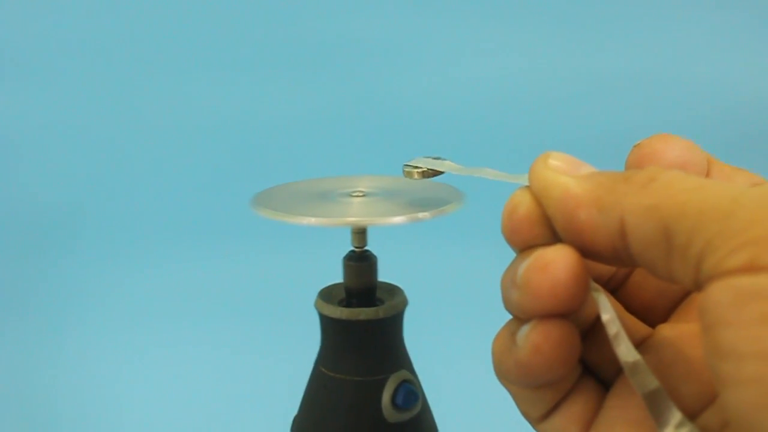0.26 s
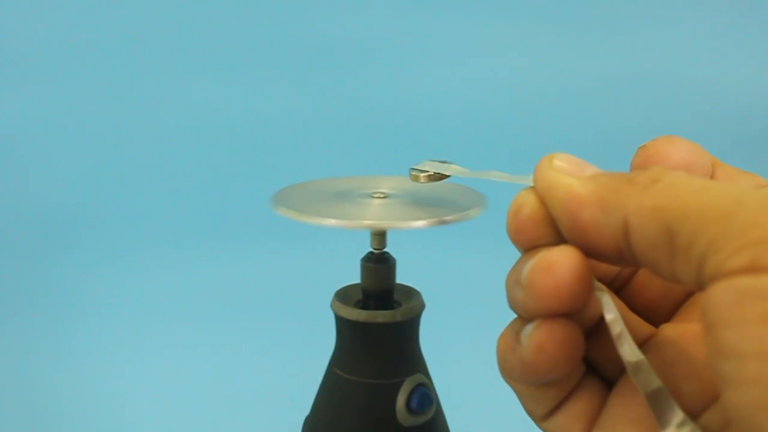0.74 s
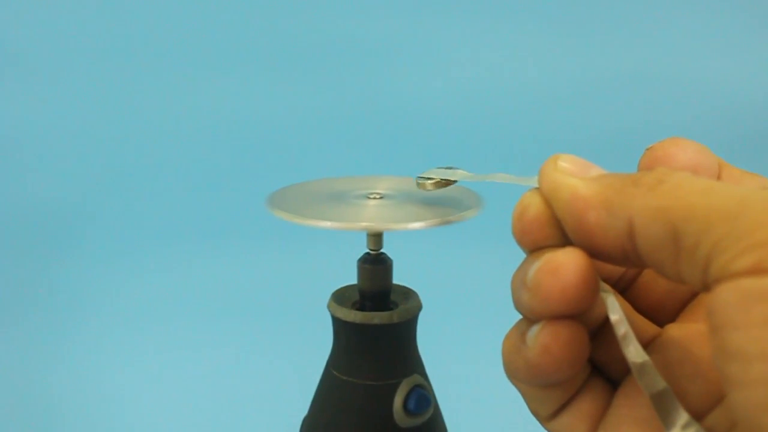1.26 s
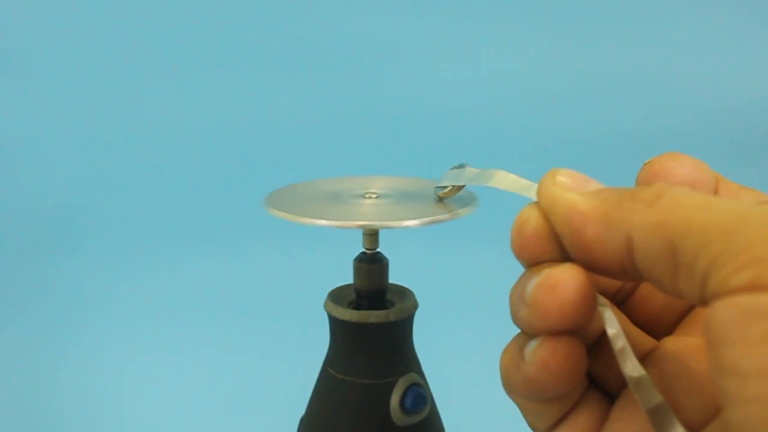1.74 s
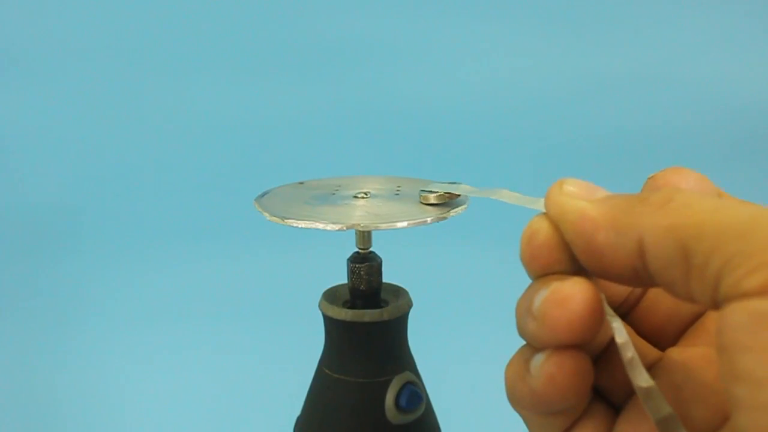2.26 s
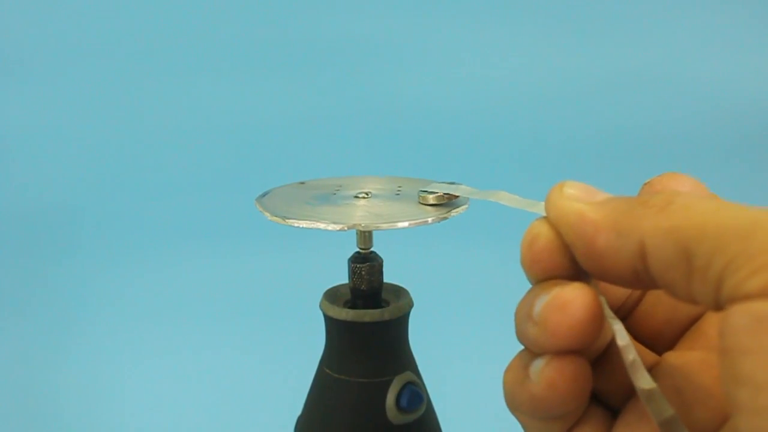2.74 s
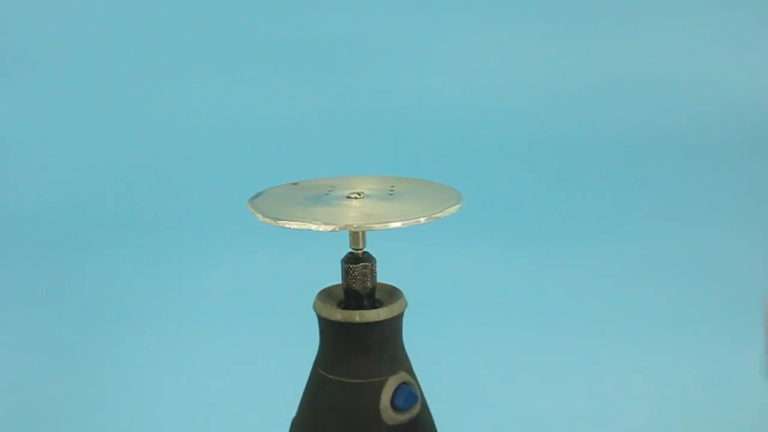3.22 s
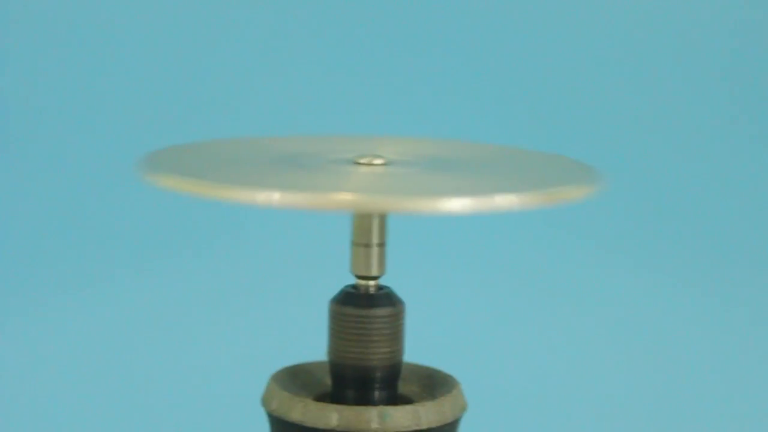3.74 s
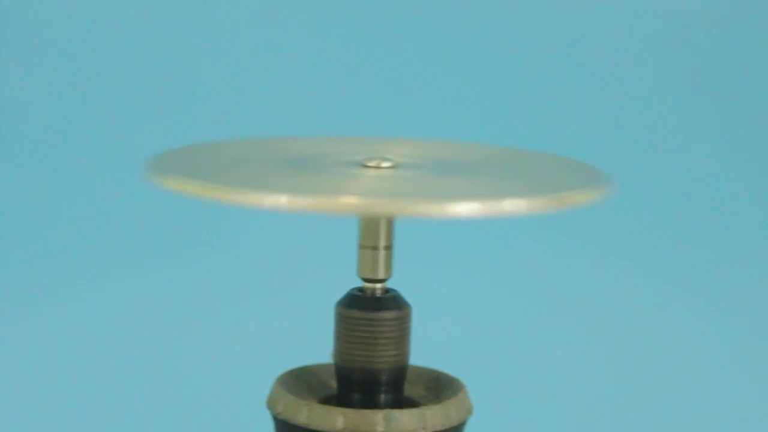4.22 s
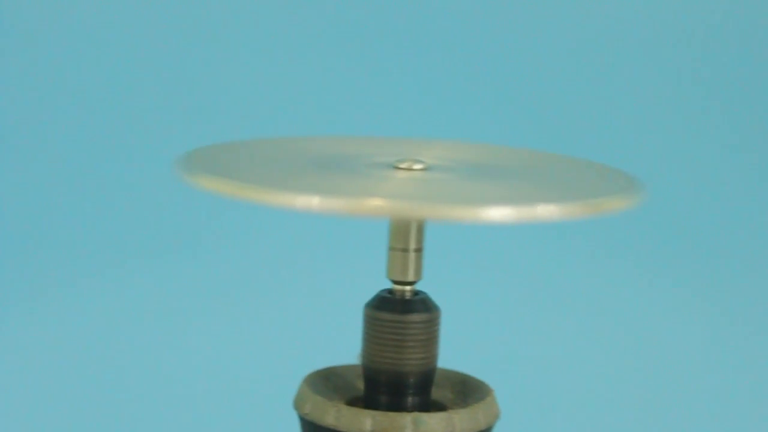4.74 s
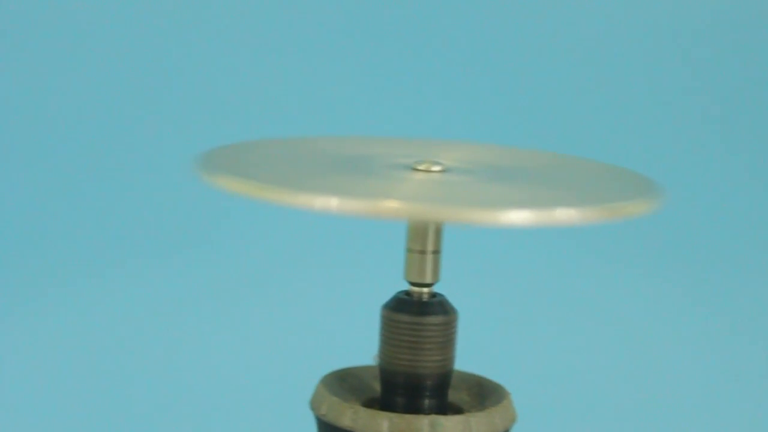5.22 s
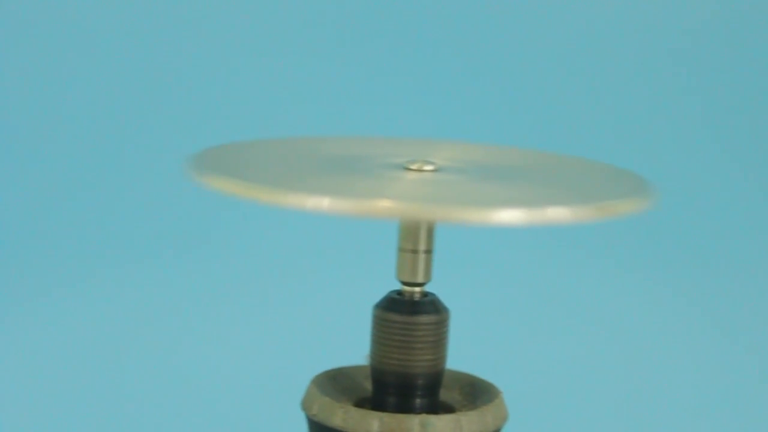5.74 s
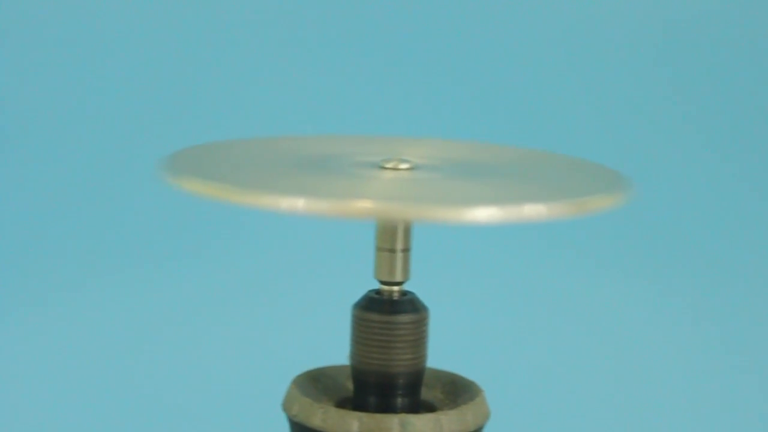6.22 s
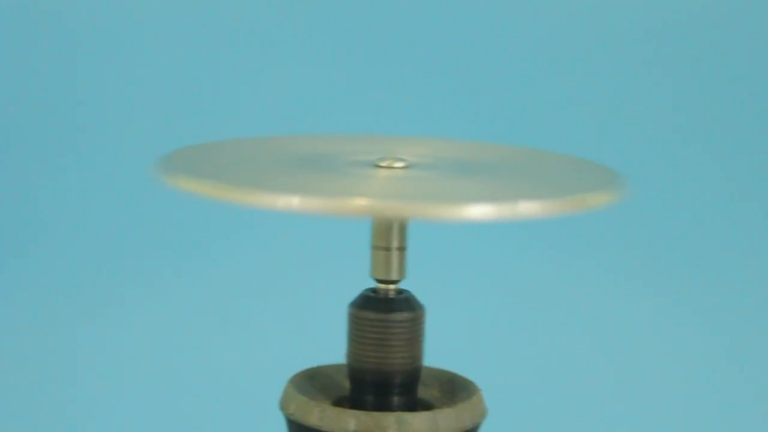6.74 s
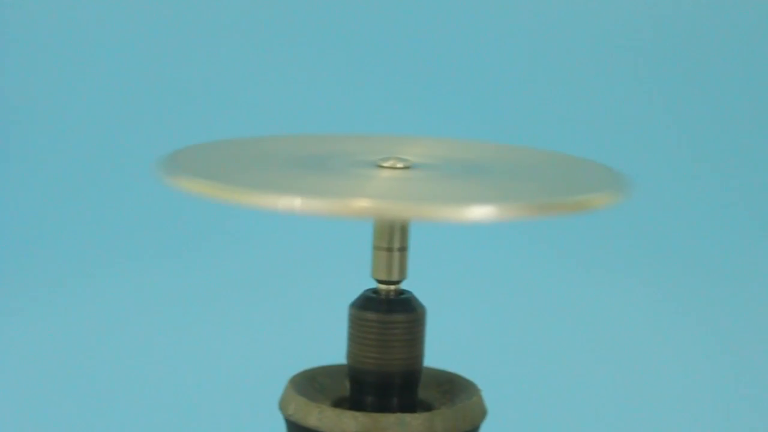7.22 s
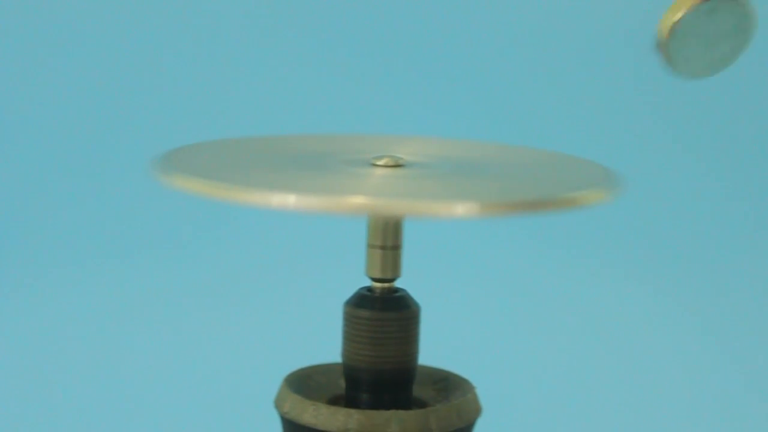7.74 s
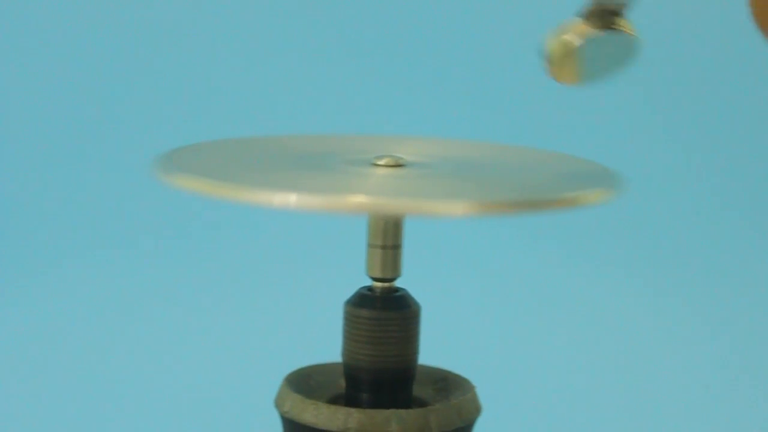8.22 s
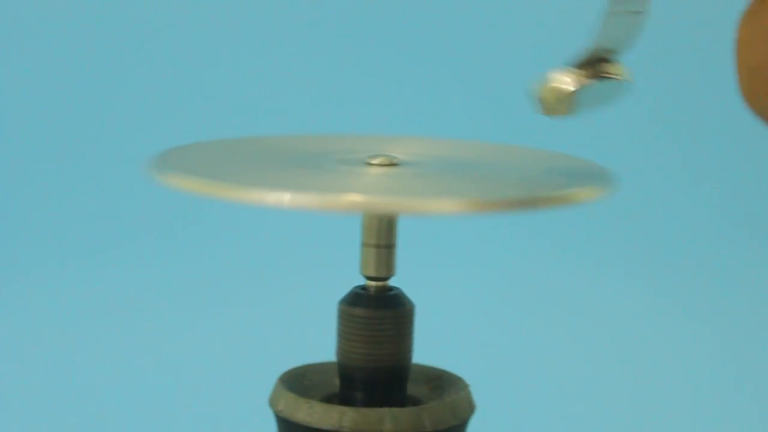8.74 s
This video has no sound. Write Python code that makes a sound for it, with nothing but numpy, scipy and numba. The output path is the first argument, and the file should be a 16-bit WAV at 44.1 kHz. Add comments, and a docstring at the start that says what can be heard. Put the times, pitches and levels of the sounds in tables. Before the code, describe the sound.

A small rotary tool winds down, a magnet strikes and scrapes its spinning metal disc, then the tool whines at full speed again.

```python
"""In a small room, a mains rotary tool spins a metal disc, is switched off and coasts down.
A magnet strikes the slowing disc, scrapes it to rest and is later pulled off, leaving it ringing.
Then the tool is abruptly at speed again and creeps up in pitch as it warms. Its unbalance hums,
its commutator and fan whine and its brushes hiss, over a bed of dull room tone."""
import sys
import numpy as np
from scipy import signal
from scipy.fft import rfft, irfft, next_fast_len
from scipy.io import wavfile
from scipy.ndimage import uniform_filter1d
from numba import njit

SR = 44100
rng = np.random.default_rng(int(sys.argv[2]) if len(sys.argv) > 2 else 0)


def bounce(signal):
    """Save signal as a 16-bit WAV file at the path given by the first command-line argument."""
    frames = np.transpose(np.atleast_2d(signal))
    limited = np.clip(frames, -1, 1)
    pcm = np.round(limited * 32767).astype(np.int16)
    wavfile.write(sys.argv[1], SR, pcm)


N = 395577
TIME = np.arange(N) / SR
POWER_OFF_S, RELEASE_S, RESTART_S = .51, 2.84, 3.48
FULL_SPEED_HZ, MAINS_PULSE_HZ = 186.3, 120


def undb(db):
    """Decibels to gain."""
    return 10 ** (np.asarray(db) / 20)

def unit(x):
    """Scale to rms 1."""
    return x / np.sqrt(np.mean(x ** 2))

def curve(table):
    """An automation curve through (time, value) points."""
    return np.interp(TIME, *np.transpose(table))

def fade(start, length):
    """A ramp from 0 to 1."""
    return np.clip((TIME - start) / length, 0, 1)

def walk(rate_hz):
    """Smooth random modulation with a spread near 1."""
    steps = signal.resample_poly(rng.standard_normal(int(rate_hz * N / SR) + 2), 10, 1)
    return np.interp(TIME * rate_hz * 10, np.arange(len(steps)), steps)

def colour(x, points):
    """EQ a sound through (Hz, dB) points; rms 1."""
    size = next_fast_len(N, real=True)
    hz, db = np.transpose(points)
    bins_hz = np.maximum(np.fft.rfftfreq(size, 1 / SR), 1)
    gain = undb(np.interp(np.log(bins_hz), np.log(hz), db))
    return unit(irfft(rfft(x, size) * gain, size)[:N])

def bell(hz, centre_hz, width_hz, peak_db):
    """A resonance's boost or cut in dB."""
    return peak_db / (1 + (2 * (hz - centre_hz) / width_hz) ** 2)

def tone(turns):
    """A sine of rms 1 that follows a phase given in turns."""
    return np.sqrt(2) * np.sin(2 * np.pi * (turns + rng.random()))

def swells(table, edge_s, waver_hz, waver_db):
    """Wavering tones that fade in, hold and fade out."""
    out = 0
    for start, length, hz, db in table:
        gate = fade(start, edge_s) - fade(start + length - edge_s, edge_s)
        gain = gate * undb(db + waver_db * walk(15))
        out += gain * tone(np.cumsum(hz + waver_hz * walk(18)) / SR)
    return out

@njit
def ring(x, hz, loss):
    """One mode whose loss (nepers per second) may change as it rings."""
    y, z, turn = np.empty(len(x)), 0j, np.exp(2j * np.pi * hz / SR)
    for i in range(len(x)):
        z = z * turn * (1 - loss[i] / SR) + x[i] + 1e-18
        y[i] = z.imag
    return y

def room(x, wet_db, t60):
    """The dry sound plus a diffuse small-room tail."""
    t = TIME[:SR // 2]
    tail = rng.standard_normal(len(t)) * np.exp(-np.log(1000) * t / t60) * (t > .004)
    return x + undb(wet_db) * signal.oaconvolve(x, tail / np.linalg.norm(tail))[:N]


# room tone fader (time [s], level [dB])
ROOM_LEVEL = [(1.5, -56), (2.1, -50.5), (3.0, -47.5), (3.7, -47.5)]
# room tone EQ (frequency [Hz], level [dB])
ROOM_EQ = [(20, -32.5), (45, -8.5), (92, -3), (200, -17.5), (312, -7.5), (430, -13.5), (980, -14),
           (2100, -22), (4000, -30.5), (7400, -35), (11000, -36), (15000, -47)]
# faint high tones (start [s], length [s], pitch [Hz], level [dB])
THIN_TONES = [(2.57, 0.18, 10000, -69), (2.66, .18, 7000, -67), (2.82, .42, 6945, -68),
              (3.08, 0.45, 8640, -67.5), (3.22, 0.29, 6945, -57.5)]

def room_tone():
    """The bed: dull air, a faint drone and a few thin, passing tones."""
    air = undb(curve(ROOM_LEVEL)) * colour(rng.standard_normal(N), ROOM_EQ)
    drone = undb(-62.5 + 2.1 * walk(6.3)) * tone(np.cumsum(317 + 5 * walk(12)) / SR)
    return air + drone + swells(THIN_TONES, edge_s=.03, waver_hz=13, waver_db=2.5)


# low tones (start [s], length [s], pitch [Hz], level [dB])
DRONES = [(3.47, .62, 76, -42), (4.18, .27, 73, -44), (4.25, 0.54, 122, -49), (5.75, .75, 118, -52),
          (7.05, .9, 54, -51), (7.15, 0.74, 108, -44.5), (8.05, 0.23, 84, -44), (8.3, .7, 82.6, -56)]
# cooling air EQ (frequency [Hz], level [dB])
DRAUGHT_EQ = [(25, -33), (60, -5), (140, -2), (250, -3), (420, 4), (560, -7), (900, -13), (3000, -62)]

def draught():
    """Cooling air rushes under the second run while low drones come and go."""
    drones = swells(DRONES, edge_s=.075, waver_hz=2.1, waver_db=-2)
    return drones + undb(-47.5) * colour(rng.standard_normal(N), DRAUGHT_EQ)


# rubs on the disc (start [s], length [s], attack [s], release [s], level [dB], slope [dB/s])
SCRAPES = [(1.498, 0.343, 0.047, 0.022, -25.5, -22.5), (2.871, 0.07, 0.027, 0.01, -45.5, 200)]
# hits on the disc (time [s], level [dB])
STRIKES = [(1.498, -11), (1.523, -23), (1.547, -33), (1.570, -21), (1.597, -16.5), (1.608, -18),
           (1.64, -16), (1.752, -20), (2.938, -26.5), (2.953, -32)]
# the disc's bending modes (frequency [Hz], level [dB], free t60 [s])
DISC_MODES = [(1750, -26, 0.17), (1761, -4.5, 0.39), (1810, -27, 0.15), (5300, -18, 0.24),
              (5420, -7.5, 1.3), (5390, -12.5, 0.21), (5503, -8.5, 0.16), (8800, -18, .15),
              (8890, 4.5, 0.21), (8890, -6, 0.15), (9500, -3, .45), (9520, -9, 0.14), (10660, -3, .12),
              (10680, -0.5, .09), (11300, -22, .08), (11900, -12, .15), (14150, -13, .05), (14380, -7, .28),
              (14400, -6, .04), (15500, -10, .07), (15500, -8, .1)]
# EQ of the magnet's grit on metal (frequency [Hz], level [dB])
CONTACT_EQ = [(300, -51), (1000, -62), (2400, 9.5), (4200, -8), (6800, -12), (8200, -33), (9600, 11),
              (12800, 2), (15500, 7.5)]

def magnet(strike_db=-10, scrape_db=-30, grit_db=-9, click_db=-18, held_t60=.28):
    """Hits and scrapes ring the disc; until it lets go, the magnet damps the high modes most."""
    pressure = 0
    for start, length, attack, release, db, slope in SCRAPES:
        age = TIME - start
        envelope = fade(start, attack) * np.exp(-np.maximum(age - length, 0) / release)
        pressure += envelope * undb(db + slope * np.clip(age, 0, length))
    scrape = unit(rng.standard_normal(N) * undb(4 * walk(700)))
    blows = np.zeros(N)
    for start, db in STRIKES:
        blows[int(start * SR)] += undb(db + strike_db)
    force = undb(scrape_db) * pressure * scrape + blows
    free = fade(RELEASE_S, .011)
    modes = 0
    for hz, db, t60 in DISC_MODES:
        pull_db = 2.5 - 4 * abs(np.log2(hz / 5300))  # pulling off plucks modes near 5300 Hz most
        pluck = 1 + free * (undb(pull_db) - 1)
        loss = np.log(1000) * (1 / t60 + (1 - free) / held_t60 * hz / 9000)
        modes += undb(db) * ring(force * pluck, float(hz), loss)
    contact = undb(grit_db) * pressure * colour(scrape, CONTACT_EQ) + undb(click_db) * blows
    return room(modes, wet_db=-7.5, t60=.58) + room(contact, wet_db=4.5, t60=.3)


def grit(turns, rough_db, throb):
    """Friction noise of the brushes, swelling once a turn."""
    grains = rng.standard_normal(N) * undb(rough_db * walk(900))
    return unit(grains * (1 + throb * np.cos(2 * np.pi * turns)))

def buzz(turns, bars_db=0, tracks=3, size=16384, harmonics=340):
    """Brushes rub the same rough track each turn; eight commutator bars set every eighth harmonic."""
    k = np.arange(harmonics)
    # 2x oversampling keeps the top harmonics clean
    place = np.interp(np.arange(2 * N) / 2, np.arange(N), turns) % 1 * size
    out = 0
    for _ in range(tracks):  # the contact wanders between tracks
        levels = np.where((k % 8 == 0) & (k > 16), undb(bars_db), rng.rayleigh(np.sqrt(.5), harmonics))
        levels *= np.clip((k - 4) / 14, 0, 1)
        track = unit(irfft(levels * np.exp(2j * np.pi * rng.random(harmonics)), size))
        out += np.repeat(walk(2.5), 2) * track[place.astype(int)]
    out = signal.resample_poly(out, 1, 2)
    return out / np.sqrt(uniform_filter1d(out ** 2, SR // 10) + 1e-6)


# brush hiss EQ under power (frequency [Hz], level [dB])
DRIVEN_EQ = [(220, -42), (380, -5), (560, -13), (729, -5.5), (1180, -7.5), (1470, -2), (2450, -10.5),
             (3280, -4), (3550, -8), (5480, -11.5), (7480, -6), (8200, -10), (8870, -6.5), (15500, -16.5)]
# the housing's EQ on the coasting brushes and rattle (frequency [Hz], level [dB])
COAST_EQ = [(250, -13), (450, -4.5), (900, -2), (1300, -5), (1800, -1), (2400, -6), (3100, -1), (4200, -7),
            (5500, -11.5), (7000, -5), (8100, -10), (8900, -3), (10700, -5.5), (11500, -7.5), (15500, -13)]

def brushes(turns, powered, mains):
    """The first run's hiss crossfades from driven to coasting, with a high ring from the disc."""
    driven = colour(grit(turns, rough_db=1, throb=.33) + undb(-3) * buzz(turns) * (1 + .57 * mains),
                    DRIVEN_EQ)
    friction = undb(1) * grit(turns, rough_db=-1.5, throb=.22)
    # reflections lag each falling partial and beat with it, so it flares and breaks
    coasting = colour(friction + room(buzz(turns, bars_db=3), wet_db=-3, t60=.2), COAST_EQ)
    out = np.sqrt(powered) * undb(-.7) * driven / driven[:SR].std()
    out += np.sqrt(1 - powered) * undb(.5) * coasting / coasting[:SR].std()
    return out + undb(-7.5) * unit(ring(rng.standard_normal(N), 8875., np.full(N, 130.)))

def rattle(turns, at_s=.736, width_s=.007, db=-28):
    """The housing chatters once, early in the coast-down."""
    burst = np.exp(-((TIME - at_s) / width_s) ** 2)
    return undb(db) * burst * colour(grit(turns, rough_db=4, throb=.99), COAST_EQ)


# low modes of mount and room (frequency [Hz], width [Hz], signed gain [linear])
MOUNT_MODES = [(182.1, 4.4, -2.7), (162.7, 4.0, 2.5), (150.5, 8.2, -2.1), (101.9, 2.5, -3.8),
               (92.3, 4.0, -3.1)]

def unbalance(hz, turns, db=-26):
    """The disc's unbalance shakes the low modes; they ring on and beat with the falling hum."""
    preroll = np.arange(-SR, 0) * FULL_SPEED_HZ / SR  # the tool is already running
    force = tone(np.r_[preroll, turns]) * np.r_[np.ones(SR), hz / FULL_SPEED_HZ] ** 2
    sway = 0
    for mode_hz, width, gain in MOUNT_MODES:
        loss = np.full(len(force), np.pi * width)
        sway += gain * 2 * loss / SR * ring(force, float(mode_hz), loss)
    return undb(db) * (force + sway)[SR:]


# peaks and dead spots of disc, housing and room (frequency [Hz], width [Hz], gain [dB])
RESONANCES = [(510, 7, 14), (525, 8, 12), (1222, 16, 2), (2502, 9, 3), (2522, 9, 4), (2541, 10, 7),
              (2576, 14, 12), (3035, 14, 3), (3060, 12, 5), (3094, 10, 4.5), (3122, 9, -6),
              (3136.3, 3, -17), (3145, 8, 3), (5445, 50, 4), (5512, 45, 6), (5592, 20, 4), (8700, 77, -16),
              (9255, 70, 8.5), (10150, 130, 7)]

def lift(hz):
    """Decibels a partial gains or loses as it glides through the narrow resonances."""
    return np.interp(TIME, TIME[::64], sum(bell(hz[::64], *row) for row in RESONANCES))

def whine(partials, hz, turns, wander_db, flutter_db):
    """Fan blades and commutator bars sing shaft harmonics, each swelling and fluttering by itself."""
    out = 0
    for order, db in partials:
        order = round(order)
        gain = undb(db + lift(order * hz) + wander_db * walk(2.465) + flutter_db * walk(30))
        out += gain * tone(order * turns)
    return out


# commutator partials while coasting (harmonic [x shaft speed], level [dB])
COAST_WHINE = [(24, -41.5), (32, -37.5), (40, -46), (48, -41), (56, -39), (64, -36), (72, -43), (80, -40),
               (88, -42), (96, -40), (104, -42), (112, -43)]

def coasting_whine(hz, turns, stop_hz=58, fade_hz=42):
    """Each partial flares as it falls through the housing's broad resonance; all die as the shaft slows."""
    out = 0
    for order, db in COAST_WHINE:
        flare = undb(bell(order * hz, centre_hz=3140, width_hz=610, peak_db=8.7))
        out += flare * whine([(order, db)], hz, turns, wander_db=0, flutter_db=4.5)
    return out * np.clip((hz - stop_hz) / fade_hz, 0, 1)


# whine under power (harmonic [x shaft speed], level [dB])
FIRST_WHINE = [(2, -55), (3, -45), (4, -42), (8, -37), (16, -33), (18, -25.5), (20, -49), (21, -54),
               (22, -54.5), (24, -56), (31, -49), (32, -40.5), (40, -34.5), (41, -40), (45, -48), (46, -43),
               (47, -49), (48, -40), (49, -42), (52, -44), (53, -39), (55, -44), (56, -45), (60, -50),
               (64, -39.5), (65, -50), (67, -48), (72, -50.5), (78, -45), (80, -57)]
# knock of the loose, coasting shaft (harmonic [x shaft speed], level [dB])
COAST_KNOCK = [(2, -39), (3, -43.5), (4, -54.5), (5, -52.5)]

def first_run(hz, turns, mains, hiss_db=-24, hiss_db_per_hz=.1):
    """The motor holds its note, loses power and winds down, knocking and fading."""
    powered = 1 - fade(POWER_OFF_S, .039)
    effort = undb(hiss_db_per_hz * (hz - FULL_SPEED_HZ))
    out = undb(hiss_db) * effort * brushes(turns, powered, mains) + unbalance(hz, turns)
    out += powered * whine(FIRST_WHINE, hz, turns, wander_db=1, flutter_db=1)
    knock = whine(COAST_KNOCK, hz, turns, wander_db=3, flutter_db=6) * effort ** .61
    bars = undb(-5.5) * coasting_whine(hz, turns) * effort
    out += (1 - powered) * room(knock + bars, wet_db=-3, t60=.41)
    return (out + rattle(turns)) * (1 - fade(1.39, .24))


# unbalance hum fader (time [s], level [dB])
HUM_LEVEL = [(3.5, -20.5), (3.76, -20.2), (3.98, -17.5), (4.5, -17.5), (5.72, -17), (6.05, -18.5),
             (8.95, -19.5)]
# brush hiss EQ (frequency [Hz], level [dB])
SECOND_EQ = [(330, -32), (560, -11.5), (700, -3.5), (900, -3.5), (1150, -5.5), (1480, -2), (2300, -3.5),
             (2650, -4), (4200, -5.5), (5100, -11), (7300, -6.5), (10400, -7), (13000, -11.5),
             (15500, -14.5)]
# fluttering whine (harmonic [x shaft speed], level [dB])
SECOND_WHINE = [(2, -40.5), (4, -46), (5, -42), (7, -43), (8, -41.5), (16, -40), (17, -43), (20, -44.5),
                (22, -44), (25, -44), (26, -48), (32, -43.5), (40, -44), (41, -41.5), (48, -44), (49, -52),
                (52, -54), (53, -37), (55, -45), (56, -41), (58, -42), (59, -44.5), (60, -37.5), (64, -49),
                (67, -43), (72, -39.5), (80, -38.5)]
# steadier partials (harmonic [x shaft speed], level [dB])
STEADY_WHINE = [(3, -45), (18, -35)]

def second_run(hz, turns, mains, surge_db=3.5, surge_s=.34):
    """The warming motor hums and whines; its brush hiss starts hot and settles."""
    hiss_db = -25.5 + surge_db * np.exp(-np.maximum(TIME - RESTART_S, 0) / surge_s) + .68 * walk(4.23)
    rubbing = grit(turns, rough_db=1, throb=.26) + undb(-1.5) * buzz(turns) * (1 + .42 * mains)
    out = undb(curve(HUM_LEVEL)) * tone(turns) + undb(hiss_db) * colour(rubbing, SECOND_EQ)
    out += undb(-1) * whine(SECOND_WHINE, hz, turns, wander_db=2, flutter_db=1.35)
    out += whine(STEADY_WHINE, hz, turns, wander_db=.4, flutter_db=0)
    return out + draught()


# mains sidebands (harmonic [x shaft speed], offset [x pulse rate], first run [dB], second run [dB])
SIDEBANDS = [(0, 2, -48, -45.5), (1, 1, -32.5, -27.5), (2, 1, -63, -52), (1, 2, -45, -45),
             (2, -1, -48, -65), (8, -1, -40.5, -58), (8, 1, -55, -42), (8, 2, -41.5, -76),
             (16, -2, -53, -37.5), (16, -1, -47, -41), (18, -1, -53, -46), (47, 1, -42, -55),
             (54, 1, -47, -50)]

def mains_sidebands(hz, turns, restarted, boost_db=2.5, easing_db_per_s=1.04):
    """Pulsing current splits tones off the harmonics; strong at the restart, they ease as it warms."""
    powered = 1 - fade(POWER_OFF_S, .039)
    hum_db = curve(HUM_LEVEL)
    follow_db = .2 * (hum_db - hum_db[int(RESTART_S * SR):].mean())
    load = restarted * undb(follow_db + boost_db - easing_db_per_s * (TIME - RESTART_S))
    out = 0
    for order, offset, first_db, second_db in SIDEBANDS:
        order, shift_hz = round(order), round(offset) * MAINS_PULSE_HZ
        partial = undb(lift(order * hz + shift_hz)) * tone(order * turns + shift_hz * TIME)
        out += partial * undb(.51 * walk(1.72)) * (powered * undb(first_db) + load * undb(second_db))
    return out


def coasting_speed(friction_hz_per_s=126, drag_per_turn=.0011):
    """Once the power goes, bearing friction and square-law air drag brake the shaft to rest."""
    knee_hz = np.sqrt(friction_hz_per_s / drag_per_turn)
    coast_s = np.maximum(TIME - POWER_OFF_S, 0)
    angle = np.arctan(FULL_SPEED_HZ / knee_hz) - friction_hz_per_s / knee_hz * coast_s
    return knee_hz * np.tan(np.maximum(angle, 0))


# the second run's pitch creep (time [s], shaft speed [Hz])
WARMING_SPEED = [(3.47, 168.2), (4, 170), (4.6, 171.3), (5.6, 172.1), (6.6, 173.4), (7.2, 173.9),
                 (8, 174.8), (8.4, 174.85), (8.97, 173.9)]

def rotary_tool():
    """One slightly jittering shaft drives both runs and their mains sidebands."""
    hz = np.where(TIME < RESTART_S, coasting_speed(), curve(WARMING_SPEED))
    turns = np.cumsum(hz * (1 + .00023 * walk(14))) / SR
    restarted = fade(RESTART_S, .003)
    mains = np.cos(2 * np.pi * MAINS_PULSE_HZ * TIME)
    runs = first_run(hz, turns, mains) + restarted * second_run(hz, turns, mains)
    return runs + mains_sidebands(hz, turns, restarted)


def scene():
    """Tool, magnet and room tone, close and dead centre."""
    mono = rotary_tool() + magnet() + room_tone()
    return np.array([mono, mono])

def record(dry, top_hz=15750):
    """A steep low-pass trims the top of the mix."""
    return signal.sosfilt(signal.ellip(10, .2, 80, top_hz, fs=SR, output="sos"), dry)


dry = scene()
out = record(dry)
bounce(out)
```